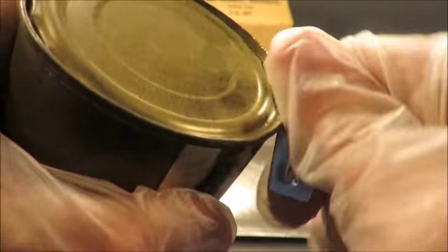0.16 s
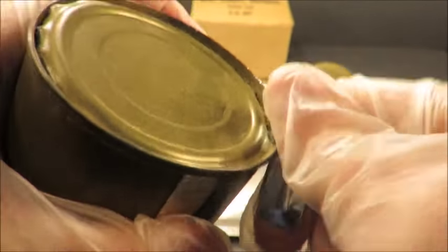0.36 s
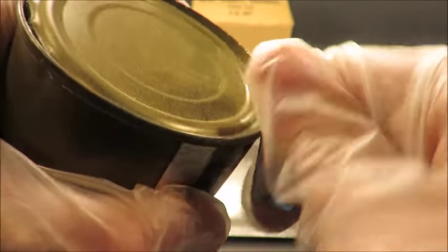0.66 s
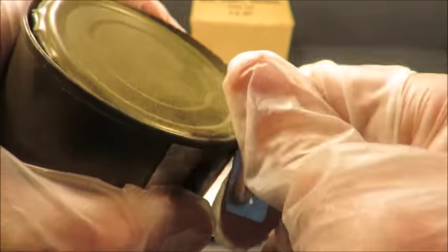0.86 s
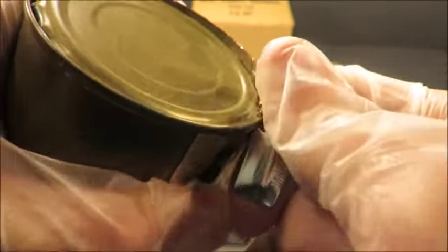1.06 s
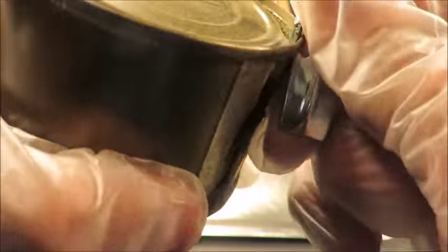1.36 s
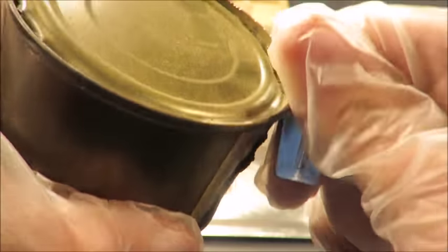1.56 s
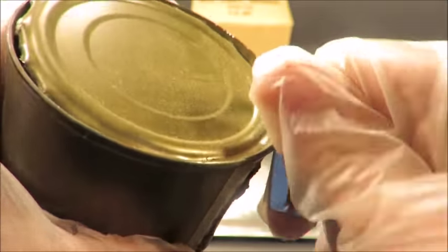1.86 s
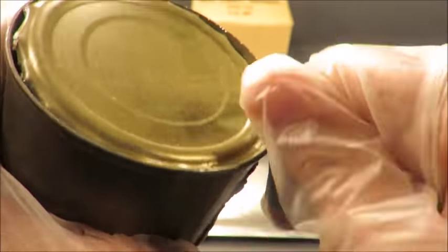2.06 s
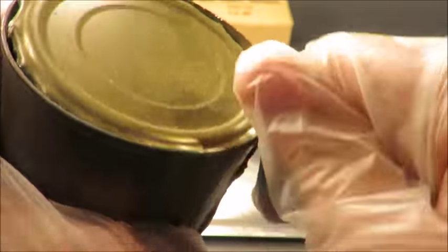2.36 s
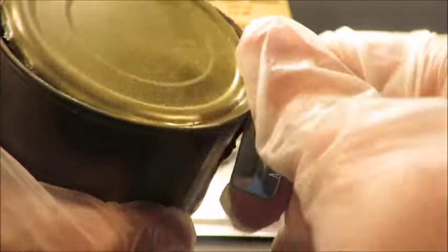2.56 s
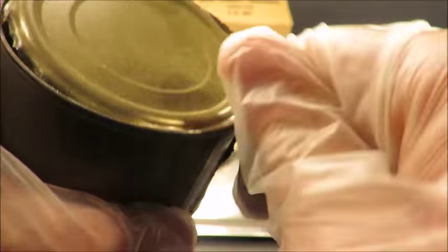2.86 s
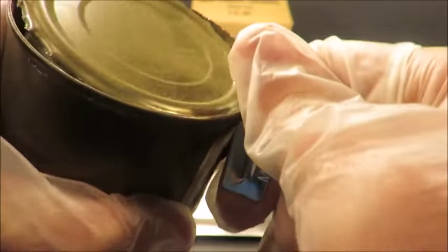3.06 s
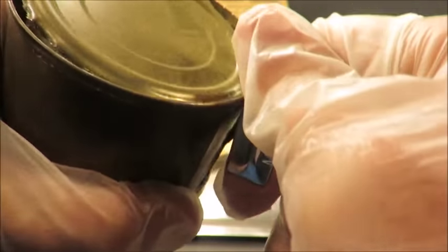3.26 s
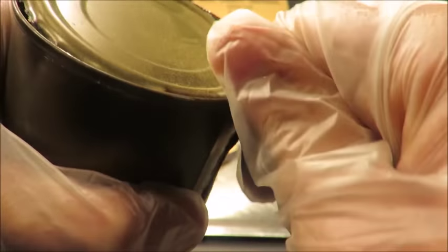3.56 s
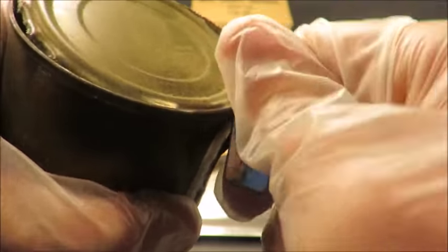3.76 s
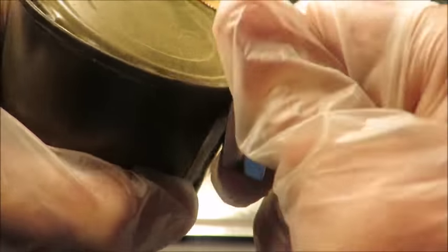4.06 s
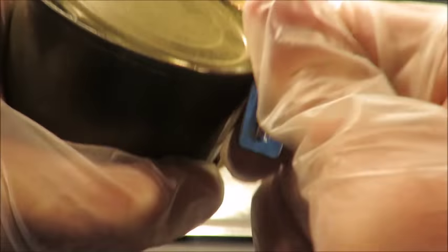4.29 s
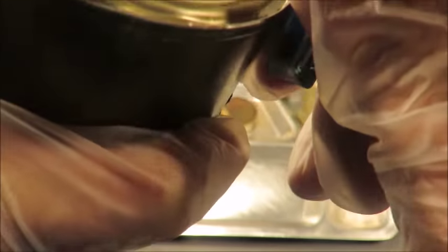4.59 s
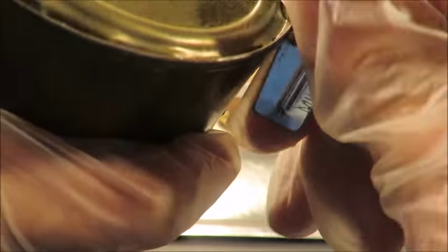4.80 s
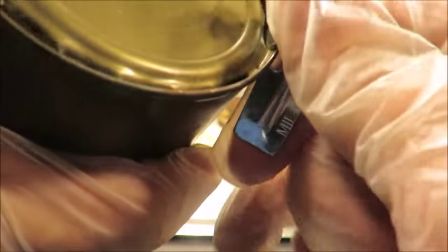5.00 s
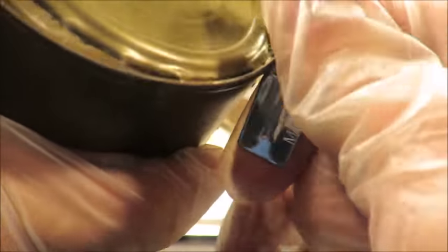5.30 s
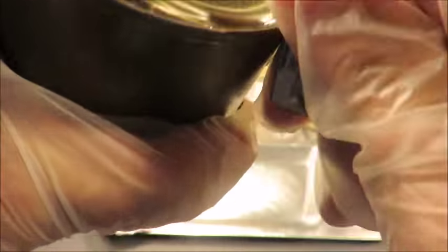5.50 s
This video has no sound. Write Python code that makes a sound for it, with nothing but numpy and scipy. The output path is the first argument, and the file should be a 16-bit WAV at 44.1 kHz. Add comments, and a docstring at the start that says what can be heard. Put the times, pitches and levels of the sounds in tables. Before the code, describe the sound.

Very close, dry metallic cracks and gritty rasps as a hand tool levers through a tin's rim. The heaviest crunches come early, some with a dull hollow thud; glove film crinkles and pops, then strokes grow lighter and uneven. After a near lull around three and a half seconds, thin bright ticks and snaps return. Small quiet room with low hum beneath.

```python
"""A small lever can opener works its way round the rim of an old tin held in gloved hands, close up in a small room.
Each snap is crackling grit, one jolt and a tear; each scrape is a dense run of tiny slips. Both shake the tin,
whose lid is a sum of dying sines that differ in each of three grips. The gloves rustle and pop as filtered noise,
the opener shifts in faint ticks and the thin wall groans in sliding tones.
Room noise and a low hum lie below, and a gain control turns everything down after loud crunches."""
import sys
import numpy as np
from scipy import signal
from scipy.fft import rfft, irfft, next_fast_len
from scipy.io import wavfile

SR = 44100
rng = np.random.default_rng(int(sys.argv[2]) if len(sys.argv) > 2 else 0)


def dump(signal):
    """Clip the signal to [-1, 1] and save it as 16-bit WAV at the path in sys.argv[1]."""
    limited = np.clip(np.atleast_2d(signal).T, -1, 1)
    pcm = np.round(limited * 32767).astype(np.int16)
    wavfile.write(sys.argv[1], SR, pcm)


N = 248591
T = np.arange(N) / SR    # time in seconds
TAIL = SR // 6           # length of one touch's ringing, in samples
LEFT_RIGHT = np.array([[1], [-1]])
# a middling touch (dB), and how many dB of thud a touch gains per dB that it is lighter
USUAL_DB, LIGHT_THUD = -34.5, 0.16


def snaps():
    """The sheet crackles under strain for a moment, gives way in one jolt and tears on; long tears are crunchier."""
    # The blade snaps through or the hook catches. Each row: time of the jolt in seconds, clank level in dB,
    # contact pitch in Hz, tick level in dB relative to the clank, tear length in seconds.
    snap_rows = [(0.166, -25, 1910, -12.5, 0.01), (0.1748, -14, 1110, -21.5, 0.016),
                 (0.187, -19, 1190, -8, 0.0065), (0.4175, -29.5, 1130, -16.5, 0.0057),
                 (0.5081, -29.5, 1090, -12.5, .007), (0.56, -31, 940, -17, 0.0092),
                 (0.603, -34, 1120, -19, 0.0022), (0.668, -18, 1880, -18, 0.0029),
                 (0.6707, -16, 1070, -11.5, 0.0091), (0.777, -26, 1020, -24, 0.024),
                 (0.828, -39, 1190, -16, 0.0028), (0.846, -49, 1285, -9.5, .004),
                 (0.9677, -22, 1270, -14, 0.0016), (1.0896, -26, 1210, -13.5, 0.007),
                 (1.113, -33, 905, -17, 0.0023), (1.203, -22, 1150, -14.5, 0.0074),
                 (1.21, -21, 1060, -20.5, 0.011), (1.526, -40.5, 1280, -6, 0.022),
                 (1.6934, -36, 2060, -13.5, 0.0042), (1.7453, -18.5, 1220, -9, 0.0018),
                 (1.77, -35, 1010, -16, 0.009), (1.8336, -40.5, 2420, -19, 0.027),
                 (1.884, -35, 2270, -16.5, 0.0088), (2.0246, -27.5, 1810, -11, 0.01),
                 (2.3028, -33, 1870, -8, 0.031), (2.317, -29.5, 1100, -17, 0.0076),
                 (2.512, -27, 2400, -12.5, 0.033), (2.7958, -44, 1910, -11, 0.0033),
                 (2.831, -32.5, 1500, -30, 0.0072), (2.869, -27.5, 1150, -21.5, 0.01),
                 (3.0533, -33.5, 1130, -10.5, 0.00088), (3.1493, -31.5, 2570, -6.5, 0.0075),
                 (3.169, -39, 1830, -12, 0.0055), (3.2824, -46, 1390, -18, 0.0042),
                 (3.959, -36, 3180, -18, 0.0034), (4.1505, -36, 2350, -2, 0.0057),
                 (4.1626, -32, 2700, -22, 0.0072), (4.509, -47, 1980, -17, .004),
                 (4.628, -22, 1330, -8.5, 0.005), (4.7587, -29.5, 2440, -16.5, 0.0062),
                 (4.8069, -29.5, 1400, -12, .005), (4.8335, -28.5, 2300, -9.5, 0.0033),
                 (5.024, -21, 2650, -18.5, 0.0093), (5.224, -31, 2760, -37, 0.015),
                 (5.3007, -30, 2820, -10, 0.0094), (5.412, -29.5, 2080, -22, 0.0066),
                 (5.4321, -18.5, 2550, -10, 0.0037)]
    # Thud level of the hand-held body in a middling touch, one value per grip [dB relative to the clank, less 2].
    grip_thud_db = [-13, -12, -11.5]
    # How freely the lid rings after a tear of usual length, one value per grip [dB].
    grip_ring_db = [-2, -5.5, -8]
    usual_tear_s, ring_db_per_doubling = 0.0048, 5
    out = np.zeros((2, N))
    lead, contact, size = int(.003 * SR), int(.008 * SR), int(.03 * SR)
    grit_power = from_db(3) * 2 * np.pi / contact
    for s, db, contact_hz, tick_db, tear_s in snap_rows:
        grit = rng.standard_normal(size) * np.sqrt(grit_power)
        # the grit is 30 dB down after the tear length
        tear = signal.unit_impulse(size) + grit * dying(2 * tear_s, size)
        crackle = rng.standard_normal(lead) * np.linspace(0, 1, lead) ** 2.1
        strain = from_db(-5) * energy_one(crackle)
        # a short snap leaves the blade pressed on the lid and deadens it; a longer tear sets it ringing
        ring_db = grip_ring_db[grip(s)] + ring_db_per_doubling * np.log2(tear_s / usual_tear_s)
        shake = signal.fftconvolve(np.r_[strain, tear], tin_response(s, ring_db))
        thud_db = grip_thud_db[grip(s)] + LIGHT_THUD * (USUAL_DB - db)
        sound = radiate(shake, lead + contact, contact_hz, thud_db, tick_db)
        add(out, s - lead / SR, from_db(db) * sound)
    return out


def scrapes(per_s=700, spread_db=4.5, grit_db=-12):
    """Steel drags on tin: dense slips on a fine grit, swelling and easing with the push of the thumb."""
    # Each row: start in seconds, length in seconds, clank level in dB.
    scrape_rows = [(0, 0.08, -40.5), (.15, 0.036, -42.5), (.258, 0.026, -30.5), (0.298, 0.031, -38.5),
                   (.402, 0.027, -28.5), (.501, 0.042, -27.5), (0.582, 0.039, -46), (0.765, 0.046, -32),
                   (0.831, 0.019, -33.5), (1.079, 0.032, -28), (1.195, 0.012, -26), (1.512, 0.048, -43.5),
                   (1.745, 0.043, -28.5), (1.871, 0.079, -37.5), (2.023, 0.034, -30), (2.055, 0.027, -39.5),
                   (2.131, 0.01, -41.5), (2.161, 0.077, -39), (2.295, 0.047, -33), (2.437, 0.039, -37),
                   (2.51, 0.047, -39.5), (2.569, 0.058, -31), (2.712, 0.057, -36.5), (2.812, 0.083, -38.5),
                   (2.967, 0.045, -40), (3.032, 0.052, -44.5), (3.145, 0.029, -33), (3.599, 0.063, -43.5),
                   (3.718, 0.069, -45), (3.934, 0.05, -47.5), (4.063, 0.011, -51.5), (4.11, 0.074, -41.5),
                   (4.631, 0.077, -40), (4.844, 0.018, -40.5), (5.02, .015, -27.5), (5.157, 0.017, -33),
                   (5.188, 0.063, -37.5), (5.355, 0.069, -31.5), (5.497, .018, -40), (5.54, 0.076, -50)]
    # The colour changes as the blade moves round the rim. Each row: time in seconds, contact pitch in Hz,
    # tick level of a middling touch in dB relative to the clank.
    rim_rows = [(0, 1160, -20), (1.2, 1080, -18.5), (1.8, 1510, -18.5), (3.05, 1510, -16),
                (3.65, 2380, -16.5), (4.1, 2350, -9.5), (4.63, 1940, -11.5), (5.2, 2350, -17.5),
                (5.5, 1665, -10)]
    # Thud level of the hand-held body in a middling touch, one value per grip [dB relative to the clank, less 2].
    grip_thud_db = [-14, -17.5, -11]
    # How freely the lid rings, one value per grip [dB].
    grip_ring_db = [1.5, -0.5, -2]
    light_tick = 0.083    # dB of tick gained per dB that a touch is lighter
    out = np.zeros((2, N))
    rim_s, rim_hz, rim_tick_db = np.transpose(rim_rows)
    for start, length, db in scrape_rows:
        size = int(np.clip(length * SR, 256, TAIL))
        push = np.abs(np.sin(np.pi * np.linspace(0, 1, size) ** .75)) ** .45
        fine_grit = from_db(grit_db) * rng.standard_normal(TAIL)
        drag = rms_one(slips(per_s, spread_db, TAIL)) + fine_grit
        response = tin_response(start, grip_ring_db[grip(start)])
        shake = signal.fftconvolve(push * drag[:size], response)
        lighter_db = USUAL_DB - db
        contact_hz = np.interp(start, rim_s, rim_hz)
        thud_db = grip_thud_db[grip(start)] + LIGHT_THUD * lighter_db
        tick_db = np.interp(start, rim_s, rim_tick_db) + light_tick * lighter_db
        add(out, start, from_db(db) * radiate(shake, size, contact_hz, thud_db, tick_db))
    return out


# Moments when the hands take a new grip on the tin [seconds].
REGRIP_S = [1.45, 4.45]


def grip(s):
    """Which of the three grips (0, 1 or 2) holds the tin at this moment."""
    return np.searchsorted(REGRIP_S, s)


def tin_response(s, ring_db, scatter_db=2, clatter_db=-3, clatter_t60=0.048):
    """One touch: a dull knock, the crowd of hand-damped wall modes, and the free modes of the lid."""
    # The lid's modes in each grip. Each row: pitch in Hz, height over the dull knock in dB before ring_db
    # and scatter are added, time to fall by 60 dB in seconds.
    first_grip = [(227, 3, 0.031), (433, 0, 0.05), (1044, 14.5, 0.059), (1123, 3.5, 0.085),
                  (1502, 7, 0.041), (1581, 2.5, 0.049), (1920, 7.5, 0.094), (2015, 6.5, 0.051),
                  (2491, 12, 0.093), (2960, 4, 0.13), (4490, 9.5, 0.085), (5620, 9, 0.065),
                  (8820, 10, 0.014), (11410, 10, 0.026), (14000, 6, 0.014)]
    second_grip = [(272, 7.5, 0.081), (451, -2.5, 0.012), (928, 3, 0.014), (1010, 10, 0.036),
                   (1235, 8.5, 0.017), (1345, 8, 0.043), (1779, 4.5, 0.073), (1960, 4, 0.023),
                   (2428, 8, 0.032), (2753, 12.5, 0.032), (3505, 15, 0.025), (5110, 0.5, 0.0083),
                   (7030, 7.5, 0.015), (11770, 4, 0.0053)]
    third_grip = [(564, 8.6, 0.15), (886, 4.6, 0.019), (1040, 8.7, 0.013), (1292, 12.2, 0.013),
                  (1620, 1.2, 0.16), (1953, 1.8, 0.034), (2454, 1.3, 0.027), (2790, 10, 0.025),
                  (3500, 16, 0.045), (4450, 9.7, 0.076), (5660, 1, 0.069), (6770, 9.4, 0.073),
                  (8700, 2, 0.036), (11320, 12, 0.014)]
    modes = (first_grip, second_grip, third_grip)[grip(s)]
    hz, height_db, t60 = np.transpose(modes)[:, :, None]
    sign = rng.choice([-1, 1], hz.shape)
    strength = sign * from_db(height_db + rng.normal(0, scatter_db, hz.shape))
    # blade pressure detunes the lid, its fine modes most
    detune = .004 * np.sqrt(hz / 1000)
    pitch = hz * (1 + detune * rng.standard_normal(hz.shape))
    # scaled by decay time, so that a long ring does not stand higher than a short one
    peak = strength * 2 * np.log(1000) / (t60 * SR)
    lid = peak * dying(t60, TAIL) * np.sin(2 * np.pi * pitch * T[:TAIL])
    clatter = energy_one(rng.standard_normal(TAIL) * dying(clatter_t60, TAIL))
    wall = from_db(clatter_db + ring_db / 2) * clatter
    knock = signal.unit_impulse(TAIL)
    return knock + wall + from_db(ring_db) * lid.sum(0)


def radiate(shake, size, contact_hz, thud_db, tick_db, contact_db=5, contact_width_hz=520):
    """The tin gives a mid clank of rms 1 over the contact, the hand-held body a thud, the blade a tick."""
    # Colour of the bright tick. Each row: frequency in Hz, level in dB.
    tick_colour = [(3200, -3.5), (4200, 5.5), (6500, 0), (8000, -2), (10000, -5), (11400, -1.5),
                   (13000, -6.5), (14500, -8.5), (16000, -10.5)]
    clank = shake + from_db(contact_db) * resonance(shake, contact_hz, contact_width_hz)
    clank = cut(clank, 697, "high", order=3)
    clank = cut(clank, 2810, "low", order=8)
    thud = cut(shake, 135, "high", order=2)
    thud = cut(thud, 650, "low", order=4)
    tick = cut(coloured(shake, tick_colour), 3300, "high", order=4)
    # level each part over the contact itself, not its tail
    clank, thud, tick = (part / np.sqrt(np.mean(part[:size] ** 2) + 1e-20) for part in (clank, thud, tick))
    return widen(clank + from_db(tick_db) * tick + from_db(thud_db - 2) * thud)


def widen(sound, near_t60=0.0064):
    """The moving hands reflect each sound at once, differently to each side."""
    # Colour of the reflections off hands and table. Each row: frequency in Hz, level in dB.
    near_colour = [(120, -10), (300, -4.5), (600, -7.5), (1100, -27.5), (2200, -16.5), (4500, -11),
                   (9000, -10), (15000, -1.5)]
    size = SR // 50
    burst = energy_one(rng.standard_normal(size) * dying(near_t60, size))
    near = coloured(burst, near_colour)
    side = signal.fftconvolve(np.atleast_2d(sound).mean(0), near)[:sound.shape[-1]]
    return sound + side * LEFT_RIGHT    # added on the left, taken away on the right


def gloves(flutter_hz=70, flutter_db=3.0, pop_db=10, pop_t60=0.016):
    """Thin film hisses and crinkles in uneven flutters over the metal and lets go with dry pops."""
    # Gloves sliding on the tin. Each row: start in seconds, level in dB before the flutter.
    slide_rows = [(1.24, -41), (1.354, -40.5), (1.57, -52.5), (4.55, -55)]
    # Glove film letting go. Each row: time in seconds, level in dB before pop_db is added.
    pop_rows = [(1.272, -31), (1.281, -18.5), (1.3574, -19.5), (1.3838, -16), (1.4046, -35), (1.53, -25.5),
                (2.808, -37), (2.8494, -46), (3.047, -36), (3.3824, -48), (3.488, -38.5), (3.7316, -32)]
    # Colour of the rustle. Each row: frequency in Hz, level in dB.
    rustle_colour = [(180, -32), (300, -8.5), (455, -11.5), (762, -18), (1010, -8), (2570, -10),
                     (3130, -12.5), (11900, -14.5), (16000, -21.5)]
    attack_s, t60_s = 0.018, 0.5
    level = np.zeros(N)
    swell = np.minimum(T / attack_s, from_db(-60 * (T - attack_s) / t60_s))
    for s, db in slide_rows:
        add(level, s, from_db(db) * swell)
    flutter = from_db(flutter_db * rms_one(cut(rng.standard_normal(N), flutter_hz, "low", order=2)))
    crinkle = slips(per_s=9000, spread_db=4.2, size=N)
    out = level * flutter * rms_one(coloured(crinkle, rustle_colour))
    for s, db in pop_rows:
        burst = energy_one(rng.standard_normal(TAIL) * dying(pop_t60, TAIL))
        pop = signal.unit_impulse(TAIL) + burst
        add(out, s, from_db(db + pop_db) * energy_one(coloured(pop, rustle_colour)))
    return widen(out)


def handling(level_db=-63, per_s=90, tick_db=-13):
    """In the later strokes the opener shifts on the rim, in faint dull ticks at random moments."""
    # the last moment of the second grip gives the ringing of that grip throughout
    response = tin_response(REGRIP_S[1], ring_db=0)
    shake = signal.fftconvolve(slips(per_s, spread_db=4.5, size=N), response)[:N]
    restless = np.clip(T - 2.5, 0, 1)    # fades in from 2.5 to 3.5 s
    ticks = radiate(shake, N, contact_hz=1940, thud_db=-15.0, tick_db=tick_db)
    return restless * from_db(level_db) * ticks


def groans(waver=0.34):
    """The thin tin groans and squeaks as it flexes, its pitch sliding with the strain."""
    # Each row: start in seconds, length in seconds, first pitch in Hz, last pitch in Hz,
    # level in dB before the swell and waver.
    groan_rows = [(0.173, 0.025, 271, 249, -34.5), (.505, 0.041, 200, 199, -38.5),
                  (1.2, 0.038, 255, 210, -40.5), (5.019, 0.0173, 614, 530, -29.5),
                  (5.155, 0.033, 129, 138, -43), (5.193, 0.04, 195, 232, -56.5),
                  (5.4, 0.086, 251, 203, -44), (5.505, 0.066, 3570, 3410, -54.5)]
    out = np.zeros(N)
    for s, length, first_hz, last_hz, db in groan_rows:
        along = np.clip(T[:TAIL] / length, 0, 1)
        hz = first_hz + (last_hz - first_hz) * along
        tone = np.sqrt(2) * np.sin(2 * np.pi * np.cumsum(hz) / SR)
        unsteady = 1 + waver * rms_one(cut(rng.standard_normal(TAIL), 64, "low", order=2))
        swell = np.sin(np.pi * along)
        add(out, s, from_db(db) * swell * unsteady * tone)
    return out


def surroundings(x, wall_hz=3500):
    """The small room adds a faint dull tail: dying noise, different on each side, with its treble softened."""
    t60_s, tail_db = 0.29, -17
    size = SR // 2
    tail = energy_one(rng.standard_normal((2, size)) * dying(t60_s, size))
    tail = from_db(tail_db) * cut(tail, wall_hz, "low", order=1)
    return x + signal.fftconvolve(x, tail, axes=1)[:, :N]


def room_noise(waver=0.15, air_db=-51.5):
    """Soft steady air noise, partly alike on the two sides, with a wavering low hum."""
    # Colour of the air noise. Each row: frequency in Hz, level in dB.
    air_colour = [(15, -22), (25, -16), (89, -13), (123, -10), (161, -13.5), (344, -15.5), (405, -15),
                  (451, -9), (545, -17), (659, -14.5), (775, -16.5), (3080, -25.5), (3920, -28),
                  (4250, -30), (16000, -45.5)]
    # How alike left and right are. Each row: frequency in Hz, correlation from -1 to 1.
    air_likeness = [(30, 0.88), (80, 0.94), (150, 0.077), (400, 0.06), (1500, 0.41), (5000, 0.55),
                    (15000, 0.27)]
    # Hum tones. Each row: pitch in Hz, level in dB before the waver.
    hum_rows = [(45.5, -63), (120, -64)]
    alike = [(hz, np.clip(c, -.99, .99)) for hz, c in air_likeness]
    mid = coloured(rng.standard_normal(N), [(hz, 10 * np.log10(1 + c)) for hz, c in alike])
    side = coloured(rng.standard_normal(N), [(hz, 10 * np.log10(1 - c)) for hz, c in alike])
    air = rms_one(coloured(np.array([mid + side, mid - side]), air_colour))
    hum = 0
    for hz, db in hum_rows:
        wobble = 1 + waver * rms_one(cut(rng.standard_normal(N), 3.9, "low", order=2))
        tone = np.sqrt(2) * np.sin(2 * np.pi * (hz * T + rng.random()))
        hum = hum + from_db(db) * wobble * tone
    return from_db(air_db) * air + hum


def gain_control(x):
    """A loud crunch turns the gain down; it creeps back up, so the room noise sinks and recovers."""
    threshold_db, window_s, attack_s, release_db_per_s = -26.5, 0.036, 0.044, 14
    power = smoothed(np.mean(x ** 2, axis=0), window_s)
    level_db = 10 * np.log10(power + 1e-20)
    excess_db = np.maximum(level_db - threshold_db, 0)
    # hold the largest excess so far, letting it sink at the release rate
    recovery = release_db_per_s * T
    held_db = np.maximum.accumulate(excess_db + recovery) - recovery
    return x * from_db(-smoothed(held_db, attack_s))


def slips(per_s, spread_db, size):
    """Stick-slip: clicks at random moments, mostly small, a few large."""
    sizes = from_db(spread_db * np.minimum(rng.exponential(1, size), 4))
    return sizes * rng.choice([-1, 1], size) * (rng.random(size) < per_s / SR)


def from_db(db):
    """Turn decibels into a plain factor."""
    return 10 ** (np.asarray(db) / 20)


def rms_one(x):
    """Scale to an rms (average strength) of 1."""
    return x / np.sqrt(np.mean(x ** 2) + 1e-20)


def energy_one(x):
    """Scale each channel so that its squares sum to 1."""
    return x / np.sqrt(np.sum(x ** 2, axis=-1, keepdims=True) + 1e-20)


def dying(t60, size):
    """Exponential decay that falls by 60 dB in t60 seconds."""
    return 1000.0 ** (-T[:size] / t60)


def at_hz(points, hz):
    """Read a curve of (Hz, value) points, joined by straight lines over log frequency."""
    known_hz, value = np.transpose(points)
    return np.interp(np.log(hz + 1), np.log(known_hz), value)


def coloured(x, points):
    """Causal (minimum-phase) filter with the given (Hz, dB) shape."""
    size = 2 * next_fast_len(x.shape[-1] // 2 + 2048)
    hz = np.arange(size // 2 + 1) * SR / size
    cepstrum = irfft(np.log(from_db(at_hz(points, hz))))
    # folding the second half onto the first makes the filter act only after its input
    cepstrum[1:size // 2] *= 2
    cepstrum[size // 2 + 1:] = 0
    return irfft(rfft(x, size) * np.exp(rfft(cepstrum)))[..., :x.shape[-1]]


def cut(x, hz, kind, order):
    """Butterworth filter: "high" keeps what lies above hz, "low" what lies below."""
    sos = signal.butter(order, min(hz, .45 * SR), kind, fs=SR, output="sos")
    return signal.sosfilt(sos, x + 1e-18)


def resonance(x, hz, width_hz):
    """A single ringing band around hz; a wider band dies faster."""
    r = np.exp(-np.pi * width_hz / SR)
    feed = np.array([1, 0, -1]) * (1 - r * r) / 2
    return signal.lfilter(feed, [1, -2 * r * np.cos(2 * np.pi * hz / SR), r * r], x)


def smoothed(x, seconds):
    """One-pole lag: follows x slowly."""
    r = np.exp(-1 / (seconds * SR))
    return signal.lfilter([1 - r], [1, -r], x)


def add(track, s, sound):
    """Mix a sound into the track from s seconds on."""
    at = max(round(s * SR), 0)
    track[..., at:at + sound.shape[-1]] += sound[..., :max(N - at, 0)]


def scene():
    """The work sits just left of centre, the groans in the middle, the room around them."""
    pan_db = .3    # up on the left, down on the right
    work = (snaps() + scrapes() + gloves() + handling()) * from_db(pan_db * LEFT_RIGHT)
    return surroundings(work + groans()) + room_noise()


def record(dry):
    """The gain ducks after loud crunches, the highest peaks are rounded and the top is cut at 16 kHz."""
    rounded = np.tanh(gain_control(dry))
    top_cut = signal.ellip(10, .1, 80, 16000, fs=SR, output="sos")
    return signal.sosfilt(top_cut, rounded)


dry = scene()
out = record(dry)
dump(out)
```